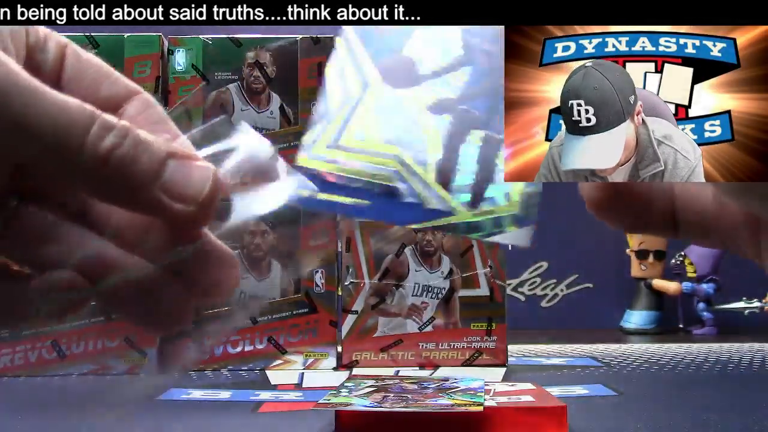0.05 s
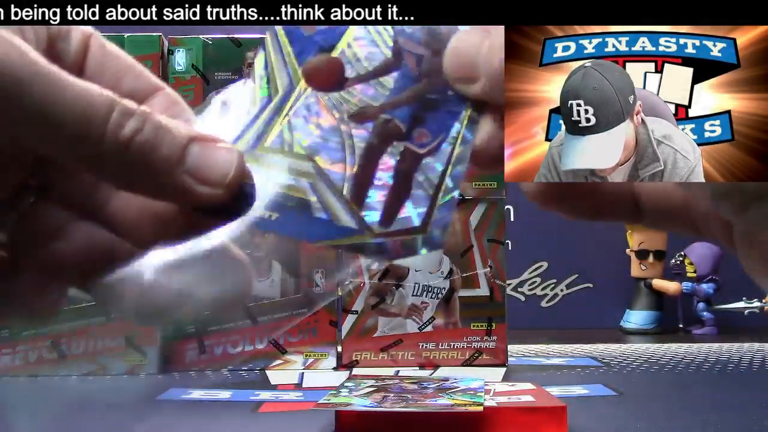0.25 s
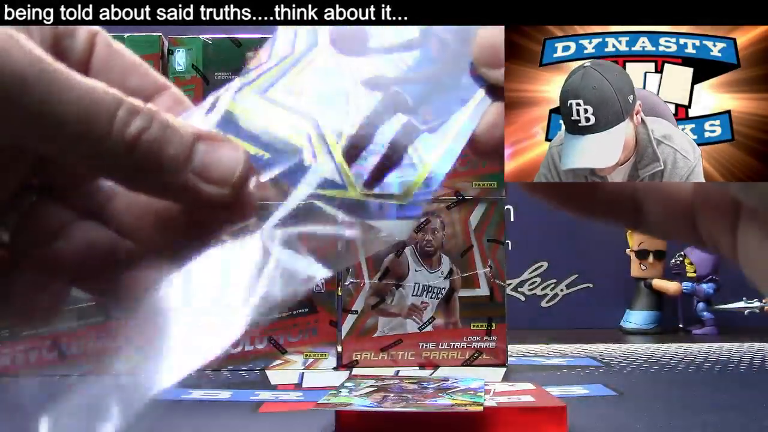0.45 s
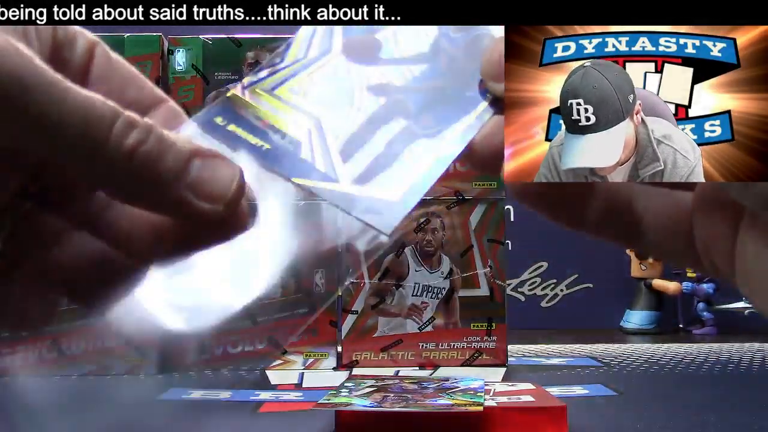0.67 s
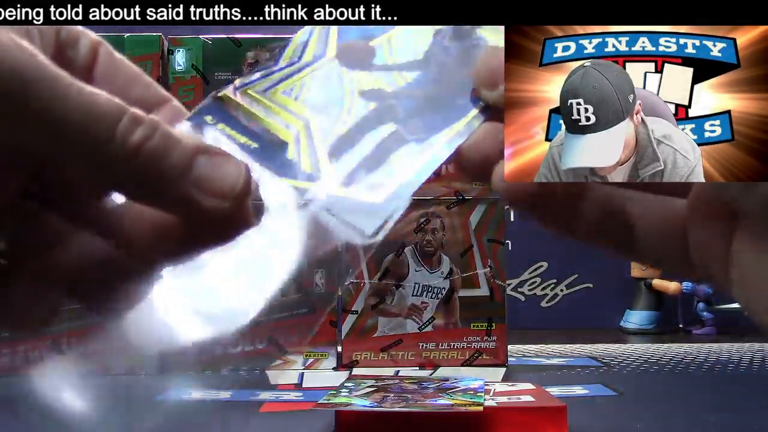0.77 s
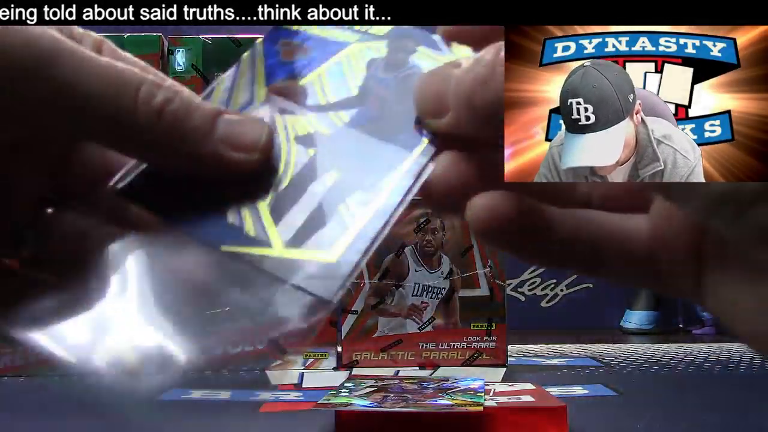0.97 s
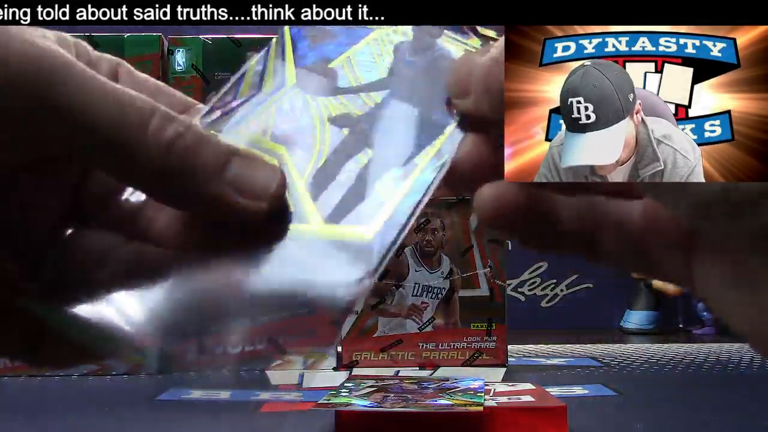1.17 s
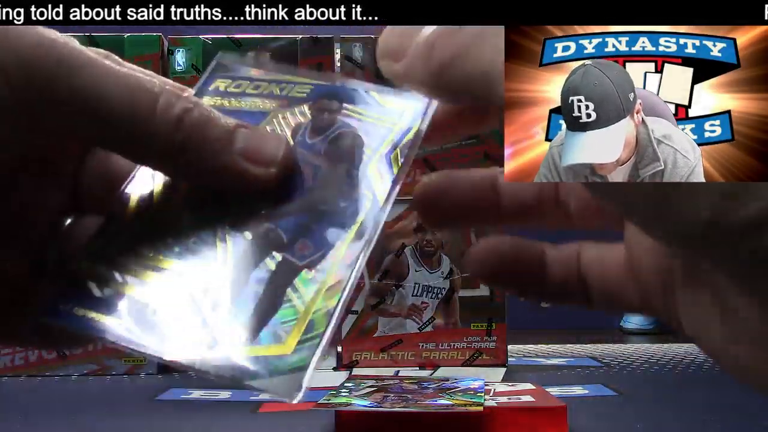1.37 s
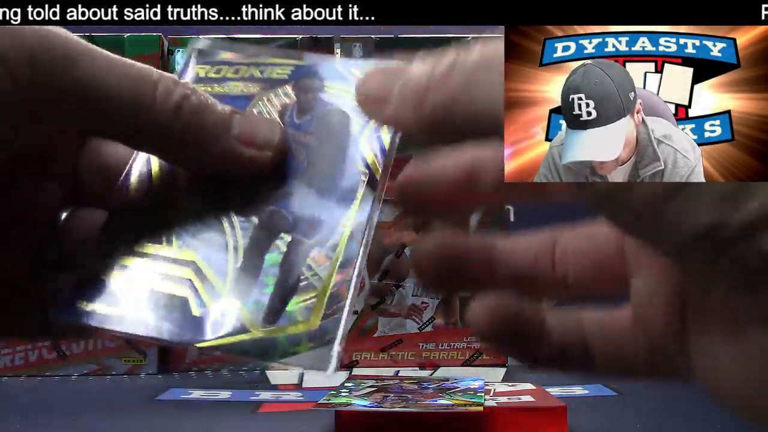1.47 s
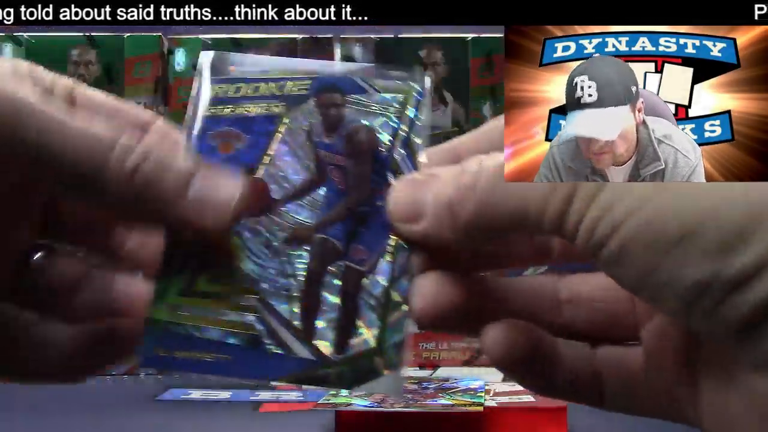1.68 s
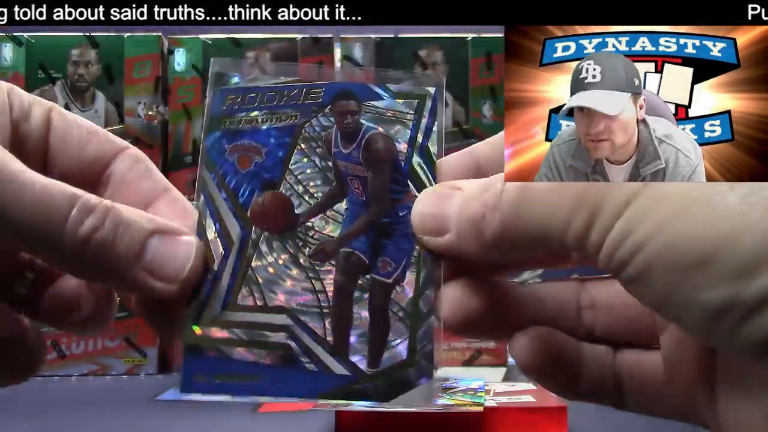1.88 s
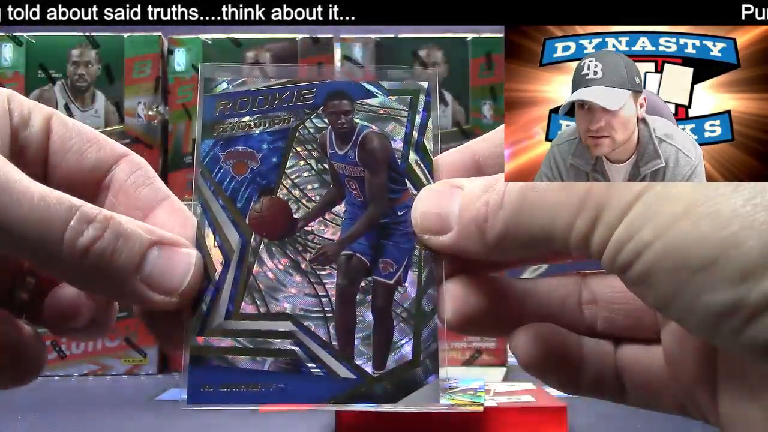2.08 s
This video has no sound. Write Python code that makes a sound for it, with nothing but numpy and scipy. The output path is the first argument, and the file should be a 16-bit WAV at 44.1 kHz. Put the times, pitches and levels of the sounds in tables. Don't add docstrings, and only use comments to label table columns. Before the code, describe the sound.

A stiff card scrapes quickly at a plastic sleeve, a fingernail ticks faintly, then a sharp bright snap and lighter click follow; soft desk taps and a tiny chair squeak, close microphone in a small room.

```python
import sys
import numpy as np
from scipy import signal
from scipy.fft import rfft, irfft
from scipy.io import wavfile
from scipy.ndimage import uniform_filter1d

SR = 44100
rng = np.random.default_rng(int(sys.argv[2]) if len(sys.argv) > 2 else 0)


def generate_wav(signal):
    frames = np.transpose(np.atleast_2d(signal))
    scaled = np.clip(frames, -1, 1) * 32767
    pcm = np.round(scaled).astype(np.int16)
    wavfile.write(sys.argv[1], SR, pcm)


def invert_db(x):
    u = np.asarray(x, float) / 20
    return 10 ** u


N = 94197
T = np.arange(N) / SR

# time in seconds, level in dB, favoured Hz.
STROKE = [
    (0, -58, 7000),
    (.014, -48, 6800),
    (.04, -50, 7020),
    (.055, -47, 4300),
    (.072, -51.5, 4000),
    (.088, -53.5, 4650),
    (.097, -64.5, 5000),
    (.115, -76.5, 4950),
    (.14, -99, 4960),
]
# frequency in Hz, density in dB per Hz.
SCRAPE_COLOUR = [(800, -61.5), (1150, -24), (1400, -17.5), (1800, -3), (4110, -4.5), (5120, -9.5),
                 (6740, -1.5), (10100, -5.5), (13400, -16.5), (15600, -35.5)]
# time in seconds, level in dB, favoured Hz.
PUSH = [
    (1.12, -100, 8900),
    (1.135, -93, 8900),
    (1.165, -84, 9000),
    (1.178, -72, 9100),
    (1.183, -49, 7900),
    (1.188, -48, 8000),
    (1.197, -56, 7800),
    (1.21, -81, 8000),
]
# frequency in Hz, density in dB per Hz.
PUSH_COLOUR = [(600, -15.5), (2000, -11), (5000, -10), (7500, -3.5), (11000, -7), (14500, -9.5),
               (15900, -18.5)]
GRAINS_PER_S, GRAIN_SPREAD_DB = 8300, 2
LIP_DB, LIP_OCTAVES = 6.5, 0.47

# time in seconds, level in dB.
SNAPS = [
    (1.1833, -41),
    (1.1840, -42),
    (1.1853, -35),
    (1.1864, -38),
    (1.1894, -26),
    (1.1941, -41),
    (1.1951, -42),
]
# frequency in Hz, level in dB, t60 in seconds.
SLEEVE_MODES = [(839.6, -23.5, .02), (1300, -18.5, .02), (2237, -16, 0.021), (4000, -13, 0.0073),
                (5380, -9.5, 0.0066), (6773, -1, 0.021), (7874, -1.5, 0.012), (8650, -9, 0.018),
                (9700, -4.5, 0.0043), (11730, -7, 0.0045), (14700, -17, 0.0042)]
# time in seconds, level in dB.
SETTLES = [
    (1.2656, -58.5),
    (1.2665, -46.5),
    (1.2675, -47.5),
    (1.2684, -41.5),
    (1.2700, -48),
    (1.2745, -59.5),
    (1.2785, -49),
]
# frequency in Hz, level in dB, t60 in seconds.
EDGE_MODES = [(1860, -15, 0.015), (3750, -7.5, 0.016), (4480, -3, 0.0055), (5600, -4.5, 0.0071),
              (6620, 2.5, 0.0041), (7970, -2, 0.018), (8580, -1, 0.015), (11540, -7.5, 0.016),
              (14420, -19, 0.0037)]
# time in seconds, level in dB.
TICKS = [
    (.3612, -81),
    (.3632, -98),
    (.3648, -64),
    (.3662, -64.5),
    (.3678, -64.5),
    (.3695, -75),
    (.3725, -80),
]
# frequency in Hz, level in dB, t60 in seconds.
NAIL_MODES = [(1990, -19, 0.013), (2214, 4, .012), (2384, 2.5, 0.016), (3790, -7, 0.014),
              (4650, -6.5, 0.0052), (6940, -6, 0.022), (10800, -23, 0.0065), (10800, -9, 0.0087),
              (12500, -4, 0.0047)]
LONGEST_RING_S = .013
SNAP_CRACK_DB, SETTLE_CRACK_DB, TICK_CRACK_DB = -19, -14, -14
CRACK_S, CRACK_ROOM_DB = .002, 4.5

# time in seconds, level in
# dB, frequency in Hz, t60 in seconds.
TAPS = [(0.386, -78.5, 426, 0.069), (0.421, -93.5, 1107, .03), (.535, -89.5, 507, 0.07),
        (.735, -87.5, 650, 0.042), (.795, -91.5, 709, 0.077), (0.653, -81.5, 350, 0.1),
        (.972, -77, 976, 0.039), (.975, -82, 773, 0.072), (1.024, -81.5, 333, 0.089),
        (1.182, -66.5, 894, .025), (1.184, -63, 1300, 0.02), (1.43, -93.5, 1290, 0.077),
        (1.468, -87.5, 748, 0.056), (1.58, -83.5, 780, 0.092), (1.599, -91.5, 1065, 0.057),
        (1.729, -67.5, 570, 0.057), (1.731, -63.5, 1408, 0.028), (1.732, -82, 1686, 0.065),
        (1.733, -89, 3200, .03), (1.731, -91.5, 1960, 0.03), (1.94, -72.5, 572, 0.031),
        (2.005, -80, 570, 0.076), (2.062, -78.5, 615, 0.043)]
KNOCK_S, KNOCK_DB = .005, 1.5
# time in seconds, frequency in Hz, level in dB.
SQUEAK = [
    (1.657, 1260, -99),
    (1.663, 1277, -75),
    (1.684, 1261, -65),
    (1.698, 1284, -92),
    (1.712, 1305, -74.5),
    (1.735, 1328, -78.5),
    (1.762, 1413, -85),
    (1.79, 1543, -83),
    (1.80, 1550, -100),
]
SQUEAK_ROUGH_DB = 2

ROOM_T60_S, ROOM_SIDE_DB, ROOM_TREBLE_HZ = 0.24, -11, 17500
SCRAPE_ROOM_DB, SNAP_ROOM_DB, SETTLE_ROOM_DB = -10, -16, -12
TICK_ROOM_DB, FAR_ROOM_DB, SQUEAK_ROOM_DB = -7.5, -5.5, -7.5
PUSH_SIDE_DB = -12.5
DIP_HZ, DIP_WIDTH_HZ, DIP_SHARE = 3152, 1800, 0.84

# time in seconds, air level in dB, blade throb in dB,
# upper air in dB against the air.
GATE = [(0.03, -50, -41.5, -31.5), (0.1, -60.5, -47.5, -20), (0.27, -52, -46.5, -33.5),
        (0.34, -58, -49, -25), (0.64, -63.5, -54, -25.5), (0.72, -59.5, -66, -31), (0.8, -63.5, -42, -23.5),
        (0.86, -61.5, -59, -27.5), (1.12, -66.5, -57.5, -27.5), (1.17, -51, -45, -23.5),
        (1.37, -57.5, -46.5, -25.5), (1.43, -46, -42, -36), (1.48, -55, -38.5, -20.5),
        (1.68, -53.5, -44.5, -27.5), (1.78, -47, -44, -33.5), (2.0, -49, -48, -30.5),
        (2.07, -50.5, -40.5, -38.5), (2.11, -41, -44.5, -42.5)]
# frequency in Hz, density in dB per Hz.
RUMBLE_COLOUR = [(14, -31), (24, 2), (43, -5.5), (78, -12), (253, -42.5), (464, -53), (565, -55.5),
                 (894, -65), (1200, -72), (1560, -87.5), (2640, -120)]
UPPER_AIR_HZ, UPPER_AIR_DB = 162.8, 27
HUM_HZ, HUM_WIDTH_HZ, HUM_DB = 124.2, 3.7, -21
RUMBLE_SIDE_DB = -23.5
BLADE_HZ, BLADE_WANDER_HZ = 15, 1.3
# frequency in Hz, density in dB per Hz.
HISS_COLOUR = [(710, -34), (1200, 2), (1280, 2.5), (1490, -1), (2950, -7), (15500, -6.5)]
HISS_DB, HISS_FOLLOWS = -101, 0.5
OFFSET = -.0004


def rms_one(x):
    return x / np.sqrt(np.mean(x ** 2) + 1e-20)


def in_time(rows):
    s, *columns = np.transpose(rows)
    return [np.interp(T, s, c) for c in columns]


def colour(x, spectrum):
    hz, db = np.transpose(spectrum)
    f = np.maximum(np.fft.rfftfreq(N, 1 / SR), 1)
    gain = invert_db(np.interp(np.log(f), np.log(hz), db, left=-80, right=-80))
    return irfft(rfft(x) * gain, N)


def drift(rate):
    r = np.exp(-2 * np.pi * rate / SR)
    white = rng.standard_normal(N + SR)
    return rms_one(signal.lfilter([1], [1, -2 * r, r * r], white)[SR:])


def ring(x, hz, t60):
    r, w = invert_db(-60 / (t60 * SR)), 2 * np.pi * hz / SR
    return signal.lfilter([0, np.sin(w)], [1, -2 * r * np.cos(w), r * r], x + 1e-18)


def burst(length_s):
    t = T[:SR // 10]
    puff = rng.standard_normal(len(t)) * t / length_s * np.exp(-t / length_s * 2)
    return puff / np.sqrt(np.sum(puff ** 2))


def scrape(stroke, spectrum):
    db, lip_hz = in_time(stroke)
    sizes = invert_db(GRAIN_SPREAD_DB * np.minimum(rng.exponential(1, N), 5)) * rng.choice([-1, 1], N)
    occurs = rng.random(N) < GRAINS_PER_S / SR
    grains = rms_one(colour(sizes * occurs, spectrum))
    edges, out = 707 * 2 ** np.arange(0, 4.6, .5), 0
    for low, high in zip(edges, edges[1:]):
        band = signal.sosfilt(signal.butter(2, [low, high], "band", fs=SR, output="sos"), grains)
        away = np.log2(np.sqrt(low * high) / lip_hz) / LIP_OCTAVES
        out = band * invert_db(LIP_DB * np.exp(-away ** 2) + 1.3 * drift(60)) - out
    touching = (T >= stroke[0][0]) & (T < stroke[-1][0])
    return out * invert_db(db - 8.0) * touching


def struck(hits, modes, longest=LONGEST_RING_S):
    s, db = np.transpose(hits)
    chance, out = rng.standard_normal((len(s), len(modes))), 0
    for k, (hz, mode_db, t60) in enumerate(modes):
        clicks = np.zeros(N)
        clicks[(s * SR).astype(int)] = invert_db(db + mode_db + 2 * chance[:, k]) / 2 * (-1) ** k
        out = out + ring(clicks, hz, min(t60, longest))
    return out


def crack(hits, crack_db, low_hz, high_hz):
    out = np.zeros(N + SR)
    for s, db in hits:
        start = int(s * SR)
        out[start:start + SR // 10] += invert_db(db + crack_db + 12) * burst(CRACK_S)
    band = signal.butter(2, [low_hz, high_hz], "band", fs=SR, output="sos")
    return room(signal.sosfilt(band, out[:N] + 1e-18), CRACK_ROOM_DB)


def taps():
    out = np.zeros(N + SR)
    for s, db, hz, t60 in TAPS:
        puff = np.pad(burst(KNOCK_S), (0, SR // 10))
        rub = signal.lfilter(*signal.iirpeak(hz, 2, SR), puff)
        knock = ring(rub, hz, t60)
        start = int(s * SR)
        out[start:start + len(knock)] += invert_db(db + KNOCK_DB) * knock / np.max(np.abs(knock))
    return out[:N]


def squeak():
    hz, db = in_time(SQUEAK)
    on = (T > SQUEAK[0][0]) & (T < SQUEAK[-1][0])
    level = invert_db(db + SQUEAK_ROUGH_DB * drift(48.2))
    phase = 2 * np.pi * np.cumsum(hz + 8 * drift(37)) / SR
    return np.sqrt(2) * on * level * np.sin(phase)


def desk_dip(x):
    return x - DIP_SHARE * signal.lfilter(*signal.iirpeak(DIP_HZ, DIP_HZ / DIP_WIDTH_HZ, SR), x)


def room(x, room_db):
    t = T[:SR // 2]
    tail = rng.standard_normal((2, len(t))) * invert_db(-60 * t / ROOM_T60_S) * (t > .003)
    tail = signal.sosfilt(signal.butter(1, ROOM_TREBLE_HZ, fs=SR, output="sos"), tail)
    tail = tail / np.sqrt(np.sum(tail[0] ** 2))
    mid, side = signal.fftconvolve(x[None], tail, axes=1)[:, :N]
    return x + invert_db(room_db) * (mid + invert_db(ROOM_SIDE_DB) * side * [[1], [-1]])


def narrow(hz, width_hz):
    t60 = np.log(1000) / (np.pi * width_hz)
    return rms_one(ring(rng.standard_normal(N + SR), hz, t60)[SR:])


def rumble(bright_db):
    air = rms_one(colour(rng.standard_normal(N), RUMBLE_COLOUR)) * invert_db(3.5 * drift(9))
    upper = signal.sosfiltfilt(signal.butter(2, UPPER_AIR_HZ, "high", fs=SR, output="sos"), air)
    air = air + upper * (invert_db(bright_db + UPPER_AIR_DB) - 1)
    hum = rms_one(ring(narrow(HUM_HZ, HUM_WIDTH_HZ), HUM_HZ, 0.053))
    return rms_one(air + invert_db(HUM_DB) * hum)


def throb():
    hz = BLADE_HZ + BLADE_WANDER_HZ * drift(2.5)
    return np.sqrt(2) * np.sin(2 * np.pi * np.cumsum(hz) / SR + 1.6)


def hiss(gate_db):
    white = rng.standard_normal((2, N))
    mid, side = [rms_one(colour(w, HISS_COLOUR)) for w in white]
    follow_db = HISS_FOLLOWS * (uniform_filter1d(gate_db, size=SR // 4) - gate_db.mean())
    return invert_db(HISS_DB + follow_db) * (mid + invert_db(-0.5) * side * [[1], [-1]])


def scene():
    gate_db, throb_db, bright_db = in_time(GATE)
    snap = desk_dip(scrape(PUSH, PUSH_COLOUR) + struck(SNAPS, SLEEVE_MODES))
    near = room(scrape(STROKE, SCRAPE_COLOUR), SCRAPE_ROOM_DB) + room(snap, SNAP_ROOM_DB)
    near = near + room(struck(SETTLES, EDGE_MODES), SETTLE_ROOM_DB)
    near = near + room(struck(TICKS, NAIL_MODES), TICK_ROOM_DB)
    near = near + desk_dip(crack(SNAPS, SNAP_CRACK_DB, low_hz=937, high_hz=15800))
    near = near + crack(SETTLES, SETTLE_CRACK_DB, low_hz=2900, high_hz=9900)
    near = near + crack(TICKS, TICK_CRACK_DB, low_hz=1900, high_hz=14430)
    near = near + invert_db(PUSH_SIDE_DB) * scrape(PUSH, PUSH_COLOUR) * [[1], [-1]]
    far = room(taps(), FAR_ROOM_DB) + room(squeak(), SQUEAK_ROOM_DB)
    air = rumble(bright_db) + invert_db(RUMBLE_SIDE_DB) * rumble(bright_db) * [[1], [-1]]
    low = invert_db(gate_db + 3.0) * air + invert_db(throb_db) * throb()
    return OFFSET + near + far + low + hiss(gate_db)


def low_pass(x):
    return signal.sosfilt(signal.butter(12, 16020, fs=SR, output="sos"), x)


def record(dry):
    return low_pass(dry)


dry = scene()
out = record(dry)
generate_wav(out)
```